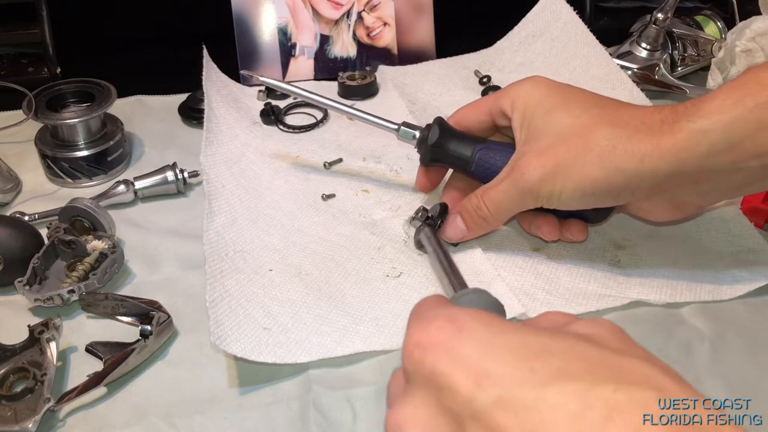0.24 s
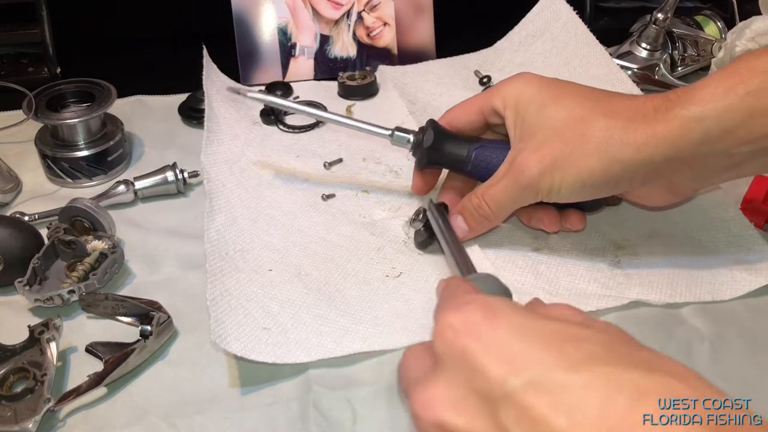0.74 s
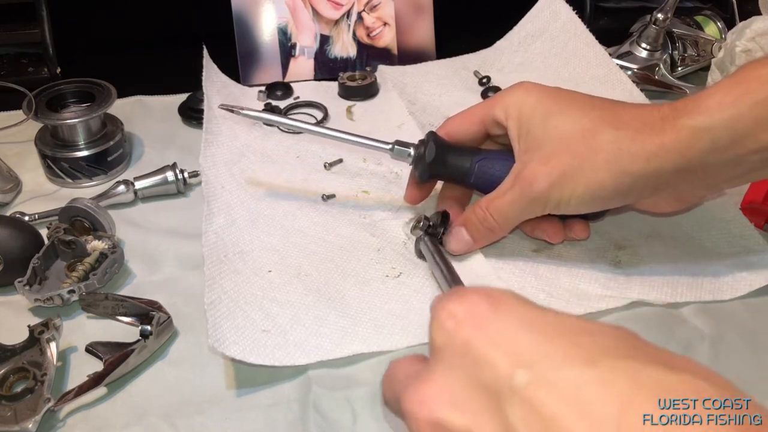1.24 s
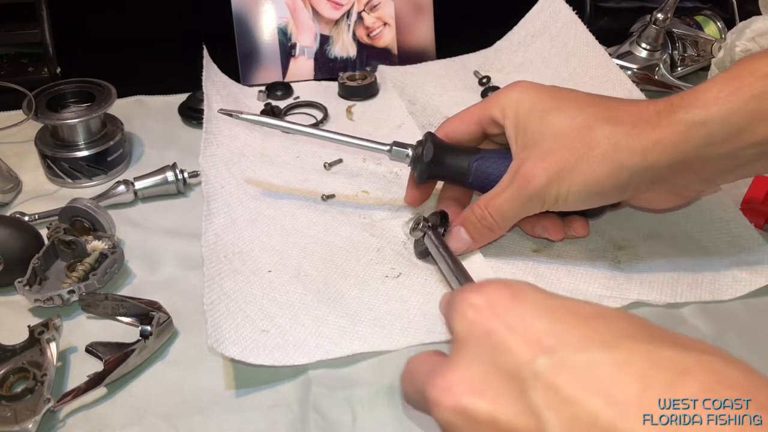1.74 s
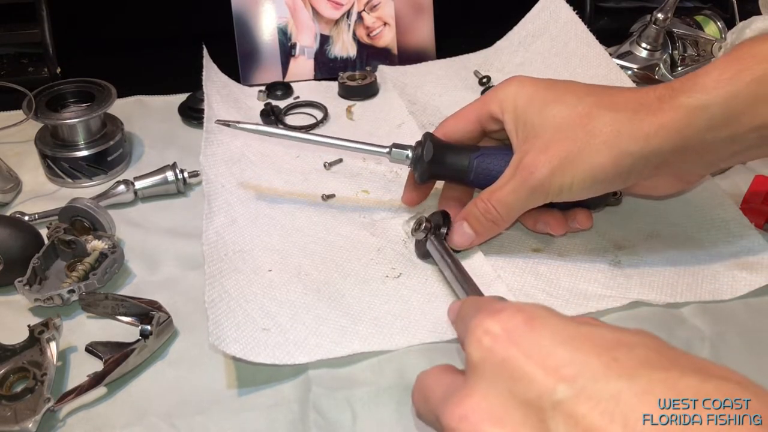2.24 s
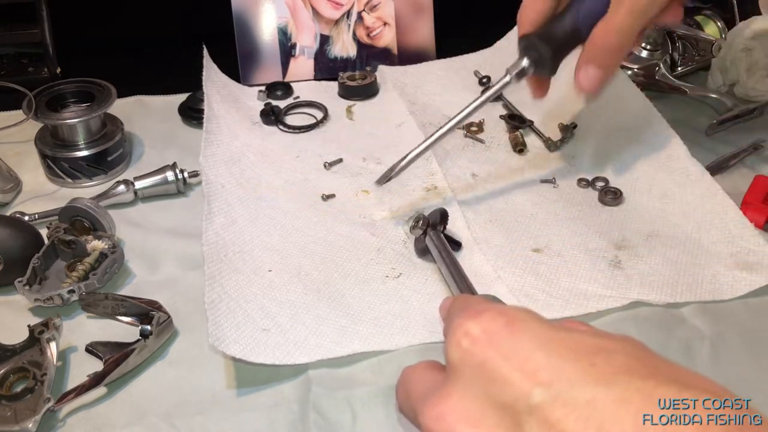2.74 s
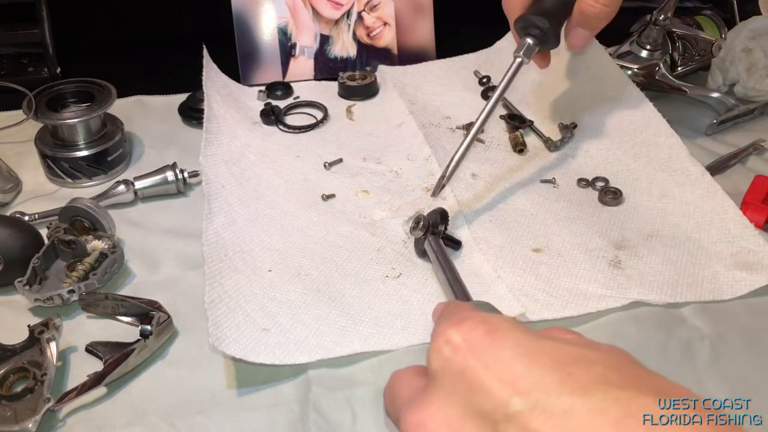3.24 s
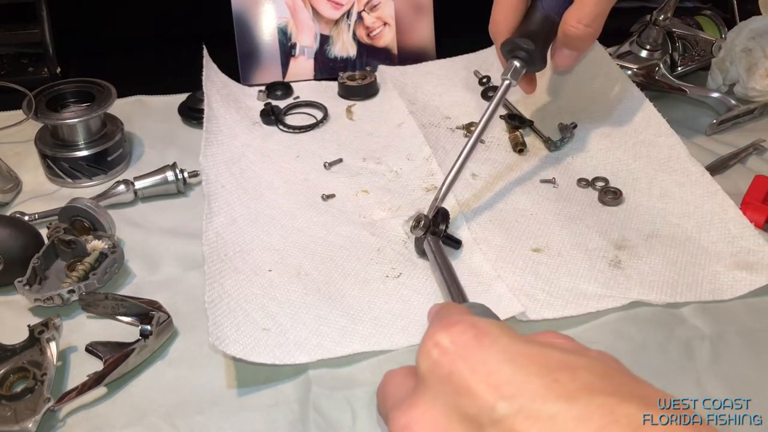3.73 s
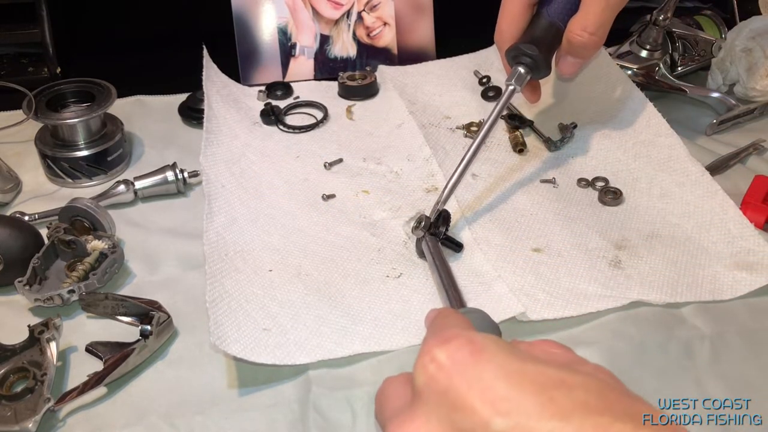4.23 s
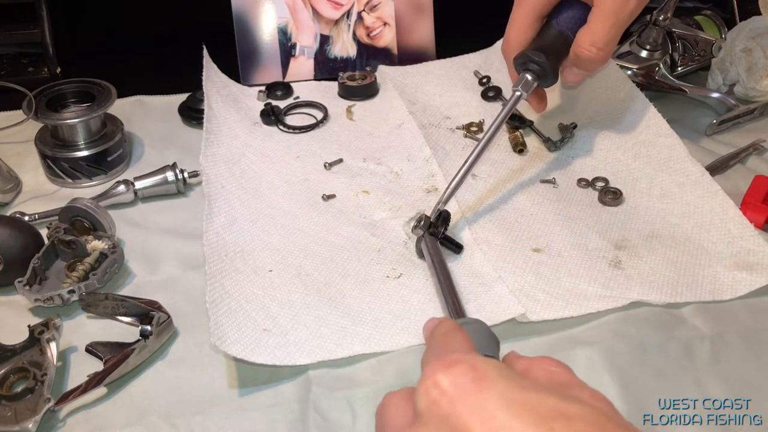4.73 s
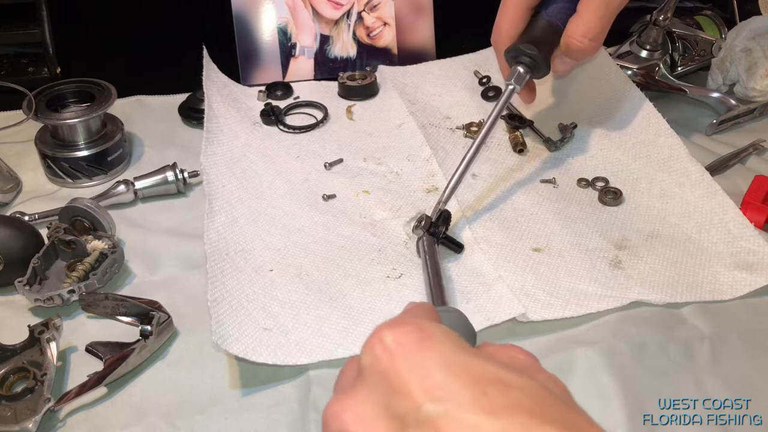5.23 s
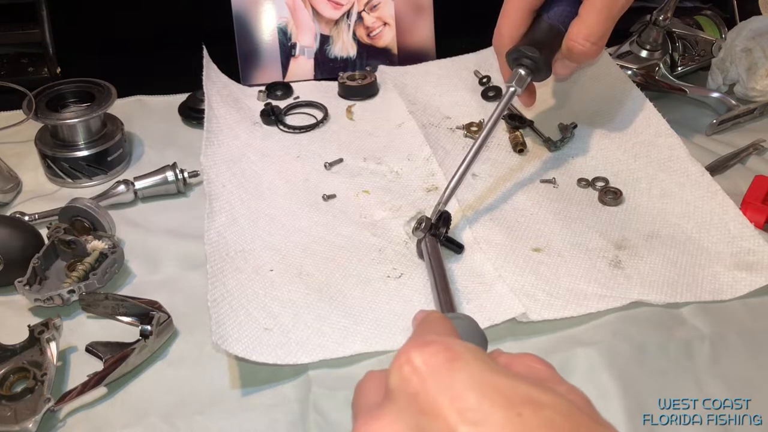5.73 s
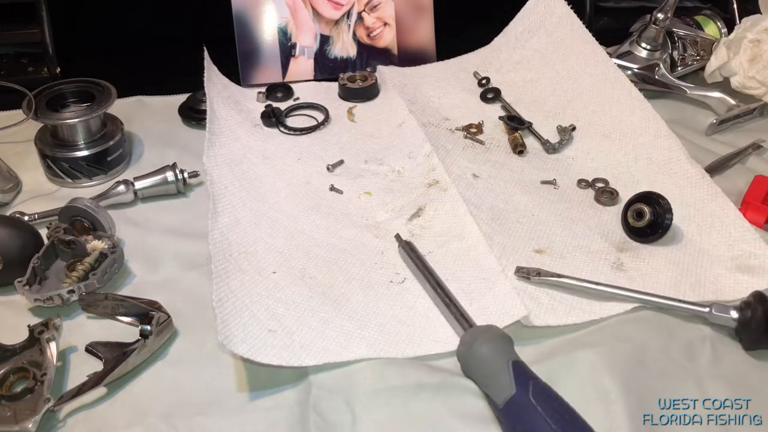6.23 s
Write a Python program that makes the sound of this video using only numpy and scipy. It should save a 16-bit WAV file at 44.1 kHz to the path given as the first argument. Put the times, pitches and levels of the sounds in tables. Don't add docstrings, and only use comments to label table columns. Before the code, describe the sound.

Close, dry metallic ticks and sharp slips of a screwdriver prying a small bearing on a papered wooden table, over a faint room hum.

```python
import sys
import numpy as np
from scipy import signal
from scipy.fft import rfft, irfft, next_fast_len
from scipy.io import wavfile
from scipy.ndimage import map_coordinates

SR = 44100
rng = np.random.default_rng(int(sys.argv[2]) if len(sys.argv) > 2 else 0)


def convert_level_to_amplitude(level_db):
    exponent = np.asarray(level_db, float) / 20
    return 10 ** exponent


def inscribe(sig):
    pcm = np.round(np.clip(np.atleast_2d(sig).T, -1, 1) * 32767)
    wavfile.write(sys.argv[1], SR, pcm.astype(np.int16))


N = 285310


def ticks():
    out = np.zeros(N)
    t = np.arange(SR // 5) / SR
    pulse = 1. * (t == 0)
    for start_s, level_db, bright_hz, shaft_db, rattle_db, shaft_hz, blade in contacts():
        direct = filtered(pulse, lambda f: steel(f, bright_hz, shaft_db, shaft_hz, scatter_db=3.5, blade=blade))
        tail = filtered(room(t), lambda f: steel(f, bright_hz, shaft_db, shaft_hz, blur=1.76, blade=blade))
        sound = (direct + convert_level_to_amplitude(rattle_db - 27) * tail) / np.abs(direct).max()
        add(out, start_s + .0007, convert_level_to_amplitude(level_db + 1.0) * sound)
    return out


# start_s, level_db (peak), bright_hz, shaft_db, rattle_db
PRY_SLIPS = [(0.3212, -17.5, 4500, -18, -9), (0.7606, -29.5, 4686, -23, -4),
             (0.7666, -30.5, 5080, -15, -5.5), (0.7822, -12.5, 4760, -15, -3),
             (0.7929, -18, 5740, -18, -13), (0.8072, -30.5, 3870, -3, -2), (1.0229, -19, 7120, -13, -3),
             (1.4122, -34.5, 4900, -6.5, -4), (4.5132, -18, 4640, -21, -12), (5.331, -42, 4660, 0, 0.5),
             (5.354, -45, 3030, 10, -14)]
# start_s, level_db (peak), bright_hz, shaft_db, rattle_db
BRACED_SLIPS = [
    (1.3482, -22.5, 4300, -12, -5),
    (2.0203, -30, 5800, -9.5, -4.5),
    (2.1246, -28.5, 5200, -10.5, -5.5),
    (2.4628, -39, 5360, -21, -8),
]
# start_s, level_db (peak), bright_hz, shaft_db
LIGHT_TAPS = [(0.1106, -48.5, 6360, -17), (0.401, -43.5, 6680, -13.5), (0.622, -48, 6700, -24),
              (1.3936, -48, 6660, -30), (1.449, -51, 5720, -18.5), (1.521, -45.5, 6560, -3),
              (2.0333, -38.5, 5060, -19), (2.2223, -44, 5030, -35), (2.245, -53, 5520, -28),
              (2.266, -46, 4060, -12), (2.283, -45.5, 5270, -4.5), (2.4776, -42, 5700, -24),
              (2.5686, -51.5, 5370, -27.5), (4.9472, -48, 5450, -2), (4.965, -56, 5400, -12),
              (5.0547, -51.5, 4840, -9), (5.399, -50, 3720, -6)]
# start_s, level_db (peak), bright_hz
FAINT_TOUCHES = [
    (0.483, -53.5, 4520),
    (0.7113, -55, 5005),
    (0.7307, -61, 3060),
    (1.657, -55.5, 3060),
    (2.3521, -55, 3200),
    (5.3104, -64, 3500),
    (5.465, -56, 3050),
    (5.6976, -59, 3050),
    (5.821, -57, 3500),
]
# start_s, level_db (peak), bright_hz, shaft_db
GAP_PROBES = [(2.8258, -52, 6870, -6), (2.8843, -51.5, 4450, -6), (2.915, -54.5, 3110, -26),
              (3.052, -55.5, 4170, -9), (3.1557, -36, 5500, -17), (3.287, -54, 3110, -2.5),
              (3.39, -42.5, 4100, -10), (3.4347, -50, 3790, -2), (3.5036, -31.5, 6800, -19),
              (3.548, -30, 5300, -14.5), (3.5977, -41, 5300, -8), (3.7225, -50, 5200, -5),
              (3.758, -51, 3070, -17), (3.7919, -45.5, 5160, -7), (3.8066, -48, 5750, -11),
              (3.8901, -56, 3200, -17), (3.9235, -35, 5400, -17), (4.0603, -54.5, 5620, -12),
              (4.14, -55, 7100, -19.5), (4.175, -45, 4930, -27)]
# start_s, end_s
WEDGED_SPAN = (3.47, 3.74)


def contacts():
    pry_hz, braced_hz = 2130, 3890
    free_hz, wedged_hz, loose_hz = 2410, 3320, 2980

    def rattle(level_db, base_db):
        return base_db + 0.1259 * (level_db + 48)

    rows = [(*row, pry_hz, STEEL_MODES) for row in PRY_SLIPS]
    rows += [(*row, braced_hz, STEEL_MODES) for row in BRACED_SLIPS]
    rows += [(*row, rattle(row[1], -2.5), pry_hz, STEEL_MODES) for row in LIGHT_TAPS]
    rows += [(*row, -15, -2, pry_hz, STEEL_MODES) for row in FAINT_TOUCHES]  # shaft_db, rattle_db
    wedged_s, loose_s = WEDGED_SPAN
    for row in GAP_PROBES:
        if wedged_s < row[0] < loose_s:
            hold = (wedged_hz, SEATED_MODES)
        elif row[0] < wedged_s:
            hold = (free_hz, SECOND_MODES)
        else:
            hold = (loose_hz, SECOND_MODES)
        rows.append((*row, rattle(row[1], -8.5), *hold))
    return rows


# pitch_hz, width_hz, level_db
STEEL_MODES = [(3782, 290, -7.5), (4520, 280, -0.5), (5000, 810, -3), (5990, 250, 1), (6340, 350, -1),
               (7324, 630, -3)]
# pitch_hz, width_hz, level_db
SECOND_MODES = [(3840, 600, -4.5), (5020, 560, -5), (5550, 310, -1.5), (7050, 400, -1.5), (7660, 230, -12)]
# pitch_hz, width_hz, level_db
SEATED_MODES = [(3480, 380, -0.5), (4400, 540, -8.5), (5300, 550, 0), (6140, 300, -3), (6620, 420, 1),
                (7530, 750, -4)]
# pitch_hz, width_hz, level_db
SHAFT_MODES = [(1500, 400, -14.5), (2436, 310, -9), (3570, 360, -7)]


def steel(f, bright_hz=5500, shaft_db=-8, shaft_hz=3300, scatter_db=0, blur=1, blade=STEEL_MODES, port_hz=8000):
    tip = modes(blade, f, scatter_db, blur) * (1 + modes([(bright_hz, 450, 4)], f))
    tip = tip * (f / 3600) ** 2 * soft(f, 3560)
    shaft = modes(SHAFT_MODES, f, scatter_db, blur) * (1 + modes([(shaft_hz, 170, 8)], f))
    port = 1 / (1 - (f / port_hz) ** 2 + 1j * 1.51 * f / port_hz)
    return (tip - convert_level_to_amplitude(shaft_db + 9.5) * shaft) * port ** 2


# start_s, level_db (peak)
CRACK_EDGES = [(0.3203, -67.5), (0.7611, -46.5), (0.784, -32), (0.7931, -43), (1.0246, -44), (1.3467, -56),
               (1.4124, -65), (2.0193, -56), (2.1241, -41), (2.463, -50), (4.1757, -56), (4.5146, -28)]


def cracks():
    def edge(f):
        low = modes([(7100, 1300, 5.5)], f) ** 2
        middle = modes([(9440, 2500, 0.0054)], f) ** 2
        high = modes([(13000, 5000, -10)], f) ** 2
        return low - middle + high

    out = np.zeros(N)
    t = np.arange(SR // 4) / SR
    for start_s, level_db in CRACK_EDGES:
        blow = (t == 0) + convert_level_to_amplitude(-32.5) * room(t, t60=0.15)
        add(out, start_s, convert_level_to_amplitude(level_db + 12.0) * filtered(blow, edge))
    return out


# start_s, level_db (peak), hardness_db, shudder_s
TABLE_BLOWS = [(0.696, -46, -16, 0.035), (0.765, -32, -8, 0.052), (0.786, -29.5, -5, 0.023),
               (0.796, -31, 1.5, 0.03), (0.829, -37.5, -3, 0.022), (1.026, -26, -4, 0.023),
               (1.049, -32.5, -16, 0.025), (1.349, -52, 10.5, 0.018), (1.416, -42.5, 1, 0.016),
               (1.434, -37.5, -39, 0.03), (1.499, -54, -6.5, 0.015), (1.529, -35, -14, 0.011),
               (1.655, -45.5, -11, 0.019), (1.767, -47, -14.5, 0.021), (1.963, -42.5, -13, 0.06),
               (2.026, -31.5, -9, 0.018), (3.923, -56.5, 5, 0.034), (4.518, -41, -12.5, 0.021),
               (4.946, -36.5, -14, 0.017), (4.965, -46, -8, 0.011), (5.272, -50, -29, 0.081),
               (5.332, -39.5, -6.5, 0.024), (5.398, -48, -16, 0.04), (5.467, -47, -17, 0.014),
               (5.663, -58, -12, 0.045), (5.7, -53, -12, 0.036), (5.819, -53.5, -23, 0.054)]


def knocks():
    out = np.zeros(N)
    t = np.arange(SR // 3) / SR
    for start_s, level_db, hard_db, shudder_s in TABLE_BLOWS:
        mid_db = -13.5 + .15 * (hard_db + 10) - 0.1 * (level_db + 42)
        blow = convert_level_to_amplitude(-26.0) * rng.standard_normal(len(t)) * np.exp(-t / max(shudder_s, .004))
        blow[0] = 1
        sound = filtered(blow, lambda f: wood(f, hard_db, mid_db, scatter_db=2.0) * soft(f, 2800))
        low = filtered(blow, lambda f: modes(LOW_WOOD, f))
        add(out, start_s - .0018, convert_level_to_amplitude(level_db) * sound / np.abs(low).max())
    return out


# pitch_hz, width_hz, level_db
LOW_WOOD = [(135, 71, -16), (246, 20.4, -8), (312, 30, -2), (393.6, 20, -0.5)]
# pitch_hz, width_hz, level_db
MID_WOOD = [(522.6, 77, 0), (727, 65, 3), (996.6, 11, -0.5)]
# pitch_hz, width_hz, level_db
TOP_WOOD = [(1229, 107, 3), (1577, 72, -7), (1690, 52, -1), (2130, 150, -11.5)]


def wood(f, top_db=-8, mid_db=-12, scatter_db=0):
    low = modes(LOW_WOOD, f, scatter_db)
    middle = convert_level_to_amplitude(mid_db - 5.0) * modes(MID_WOOD, f)
    top = convert_level_to_amplitude(top_db - 8.5) * modes(TOP_WOOD, f, scatter_db)
    return low + middle + top


# peak_s, level_db, length_s, hardness_db
PAPER_SHUFFLES = [(0.438, -57.5, 0.16, -19), (0.757, -53.5, 0.11, -12.5), (.80, -61.5, 0.056, 15.5),
                  (.87, -52, 0.067, -21), (1.397, -53, 0.1, -24), (1.517, -51, 0.1, -31),
                  (2.015, -52, 0.06, -23), (2.094, -59, 0.17, -22), (4.616, -49, 0.077, -26),
                  (4.874, -60.5, 0.11, -8), (4.935, -46, 0.11, -34.5), (5.36, -56, .07, -7),
                  (5.5, -69, .12, -28)]
# peak_s, level_db, length_s
TIP_RUBS = [
    [(.395, -56, 0.014)],
    [(.74, -74, .07), (.80, -41.5, 0.042), (.84, -50, 0.067), (1.06, -45.5, .03)],
    [(2.02, -48, 0.013), (2.10, -67, 0.11), (2.24, -58.5, 0.043), (2.35, -66.5, 0.083)],
    [(2.885, -70.5, .1), (3.29, -66, .03), (3.44, -67, 0.059), (3.79, -64.5, .05)],
    [(3.586, -53, 0.05)],
    [(5.34, -59.5, 0.046), (5.40, -70, 0.037)],
]
# bright_hz, shaft_db, shaft_hz
RUB_COLOURS = [
    (6095, -9.5, 2400),
    (5800, -3, 2900),
    (5560, -13.5, 2400),
    (4500, -9, 2900),
    (4500, -10, 1560),
    (4430, -13, 2400),
]


def friction():
    paper = grit(2500, 3)
    low = unit(filtered(paper, lambda f: wood(f, top_db=-30, mid_db=-13.0)))
    top = unit(filtered(paper, lambda f: modes(TOP_WOOD, f, blur=1.5) * soft(f, 2600)))
    low_strokes = [(s, db, length) for s, db, length, hard_db in PAPER_SHUFFLES]
    top_strokes = [(s, db + hard_db, length) for s, db, length, hard_db in PAPER_SHUFFLES]
    out = low * strokes(low_strokes) + top * strokes(top_strokes)

    tips = grit(2400, 2.6)
    blades = [STEEL_MODES, STEEL_MODES, STEEL_MODES, SECOND_MODES, SEATED_MODES, STEEL_MODES]
    for rows, colour, blade in zip(TIP_RUBS, RUB_COLOURS, blades):
        rub = unit(filtered(tips, lambda f: steel(f, *colour, blade=blade)))
        out = out + strokes(rows) * rub
    return out


def grit(rate, spread_db):
    size = convert_level_to_amplitude(spread_db * np.minimum(rng.exponential(size=N), 3)) * rng.standard_normal(N)
    return unit(size * (rng.random(N) < rate / SR))


def strokes(rows):
    t = np.arange(N) / SR
    gain = np.zeros(N)
    for peak_s, level_db, length_s in rows:
        slope_s = np.where(t < peak_s, .8 * length_s, length_s)
        gain += convert_level_to_amplitude(level_db - 19 * np.abs(t - peak_s) / slope_s)
    return gain


def room(t, t60=0.21, early_t60=0.028, early_db=4):
    decay = convert_level_to_amplitude(-60 * t / t60) + convert_level_to_amplitude(early_db - 60 * t / early_t60)
    lumps = convert_level_to_amplitude(2.5 * np.repeat(rng.standard_normal(len(t) // 128 + 1), 128)[:len(t)])
    return lumps * rng.standard_normal(len(t)) * decay * np.minimum(t / .002, 1)


# pitch_hz, level_db (per Hz)
AIR_SPECTRUM = [(12, -25), (25, -2), (60, -13.5), (300, -36), (1300, -51), (4000, -56), (8000, -58.5),
                (16200, -64.5)]
# pitch_hz, width_hz, level_db
DUCT_BANDS = [(35.8, 5.6, -51), (54.93, 10, -56.5), (100.1, 19, -56), (151.2, 14, -64.5),
              (251.9, 26, -63.5)]


def room_tone():
    hz, db = np.transpose(AIR_SPECTRUM)
    spectrum = lambda f: convert_level_to_amplitude(np.interp(np.log(f + 1), np.log(hz), db, -120, -120))
    out = convert_level_to_amplitude(-46.5) * unit(filtered(rng.standard_normal(N), spectrum))
    for pitch_hz, width_hz, level_db in DUCT_BANDS:
        hum = unit(filtered(rng.standard_normal(N), lambda f: modes([(pitch_hz, width_hz, 0)], f) ** 2))
        out += convert_level_to_amplitude(level_db + 1.47 * wobble(6)) * hum
    return out


# time_s, level_db
SWAY_LEVEL = [(0, -20), (.12, -25), (.3, -25), (1.1, -30), (1.7, -24), (2.5, -26), (3, -29), (4, -28),
              (4.6, -23), (5.2, -29), (5.9, -30), (6.0, -40), (6.07, -36), (6.25, -30), (6.4, -34)]


def sway(hz=7, drift=0.3273):
    turns = np.cumsum(hz * np.exp(drift * wobble(6.2))) / SR
    size = np.sqrt(2) * convert_level_to_amplitude(curve(SWAY_LEVEL) + 1.7 * wobble(5.457))
    return -size * np.cos(2 * np.pi * turns)


def modes(table, f, scatter_db=0, blur=1):
    total = 0
    for k, (pitch_hz, width_hz, level_db) in enumerate(table):
        strength = (-1) ** k * convert_level_to_amplitude(level_db + scatter_db * rng.standard_normal())
        damping = 1j * f * width_hz * blur
        total = total + strength * damping / (pitch_hz * pitch_hz - f * f + damping)
    return total


def soft(f, top_hz):
    return 1 / (1 - (f / top_hz) ** 2 + 1j * np.sqrt(2) * f / top_hz)


def filtered(x, response):
    m = next_fast_len(len(x) + SR // 20)
    return irfft(rfft(x, m) * response(np.fft.rfftfreq(m, 1 / SR)), m)[:len(x)]


def unit(x):
    return x / np.sqrt(np.mean(x ** 2) + 1e-20)


def curve(rows):
    time_s, value = np.transpose(rows)
    return np.interp(np.arange(N) / SR, time_s, value)


def wobble(rate):
    knots = rng.standard_normal(int(N * rate / SR) + 4)
    return map_coordinates(knots, [np.arange(N) * rate / SR])


def add(track, start_s, sound):
    part = track[round(start_s * SR):][:len(sound)]
    part += sound[:len(part)]


def scene():
    steel_sounds = ticks() + cracks()
    table_sounds = knocks() + friction()
    return (steel_sounds + table_sounds + room_tone() + sway())[None]


def top_cut(x):
    return signal.sosfilt(signal.butter(12, 15820, fs=SR, output="sos"), x)


# time_s, gain
SCENE_FADE = [
    (5.86, 1),
    (6.014, .12),
    (6.02, 0),
    (6.0645, 0),
    (6.0655, .16),
    (6.13, .4),
    (6.25, .95),
    (6.3, 1),
]


def record(dry):
    faded = dry * curve(SCENE_FADE)
    return top_cut(faded)


dry = scene()
out = record(dry)
inscribe(out)
```